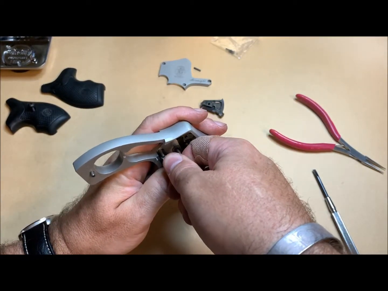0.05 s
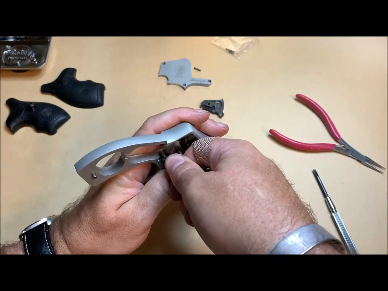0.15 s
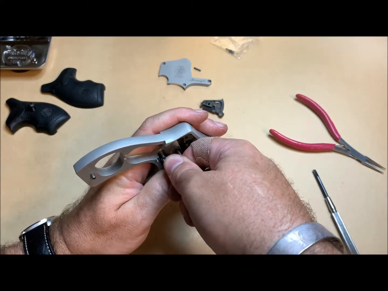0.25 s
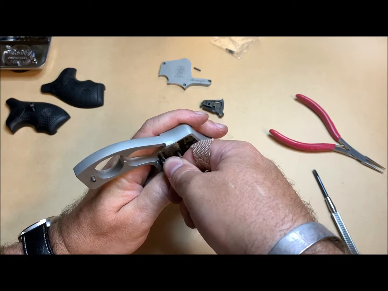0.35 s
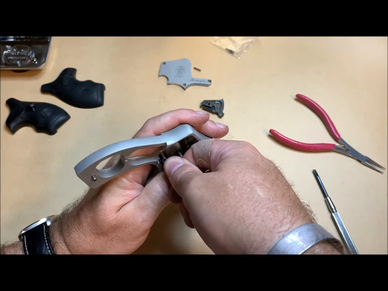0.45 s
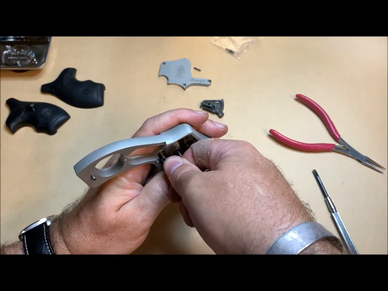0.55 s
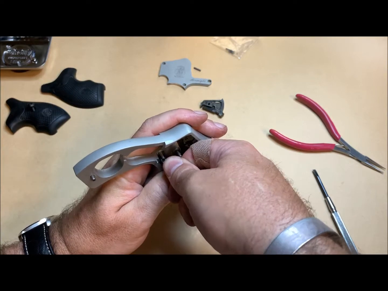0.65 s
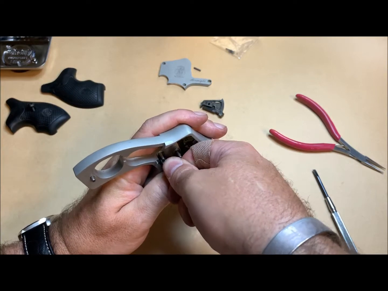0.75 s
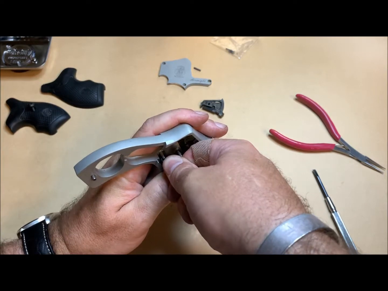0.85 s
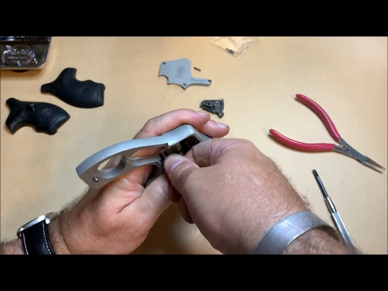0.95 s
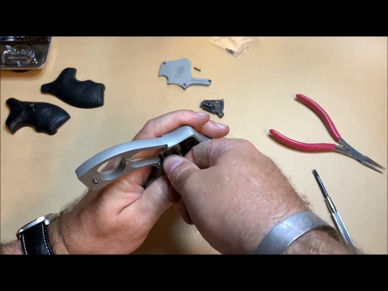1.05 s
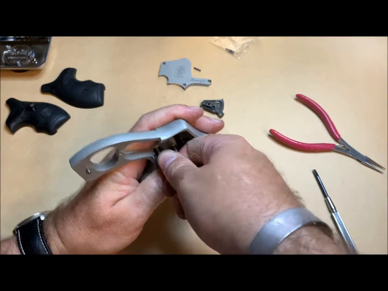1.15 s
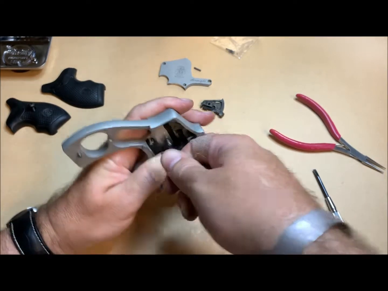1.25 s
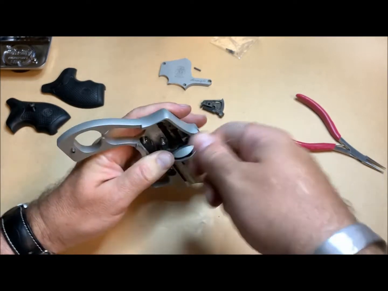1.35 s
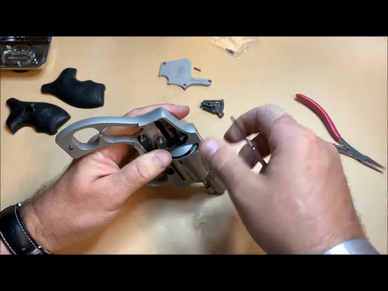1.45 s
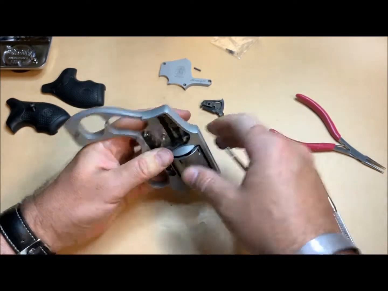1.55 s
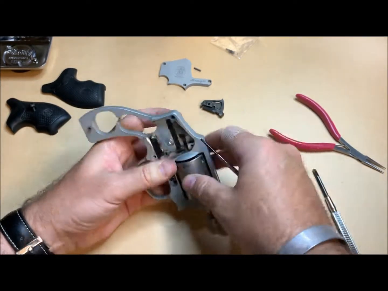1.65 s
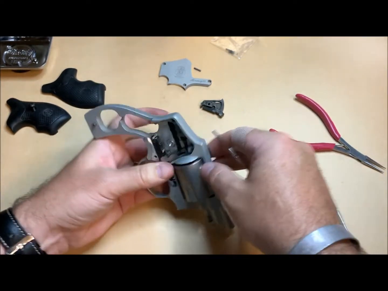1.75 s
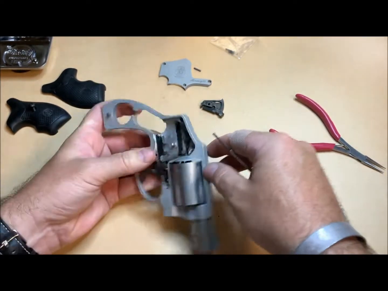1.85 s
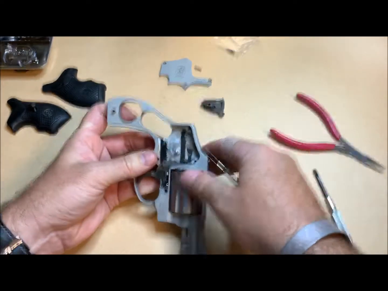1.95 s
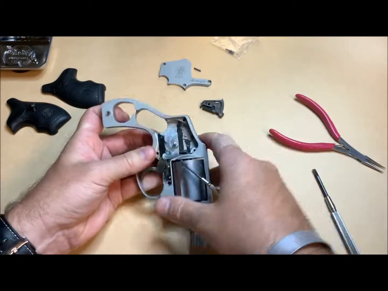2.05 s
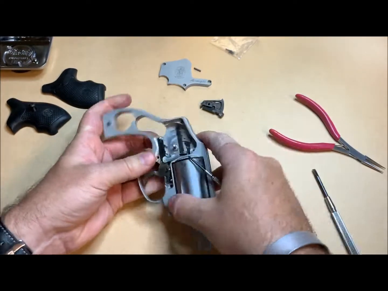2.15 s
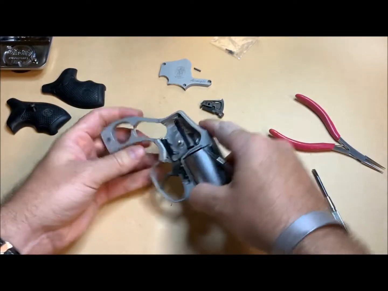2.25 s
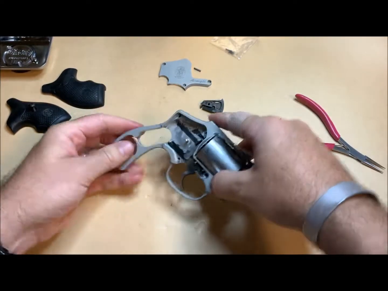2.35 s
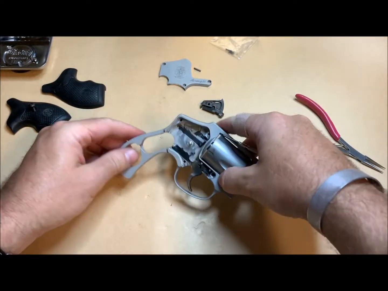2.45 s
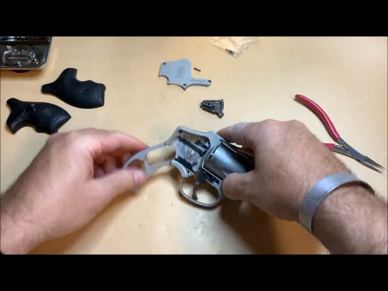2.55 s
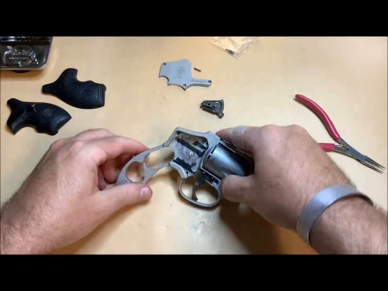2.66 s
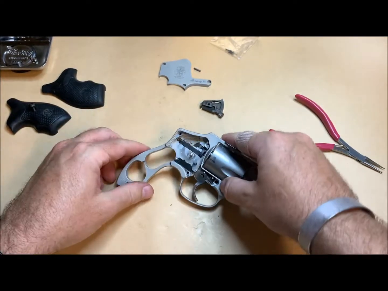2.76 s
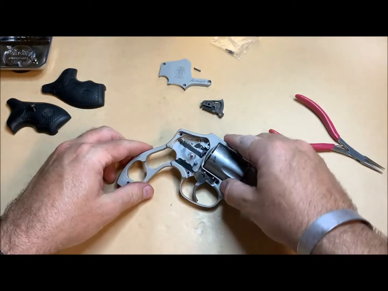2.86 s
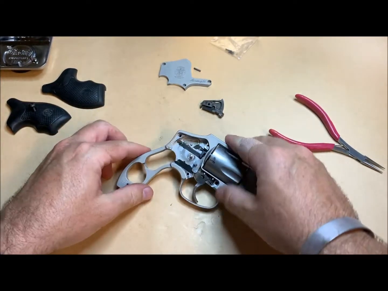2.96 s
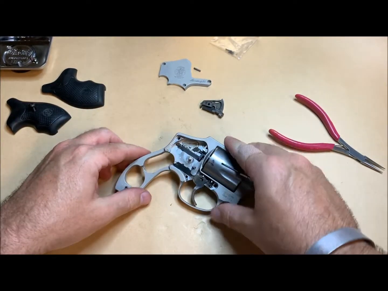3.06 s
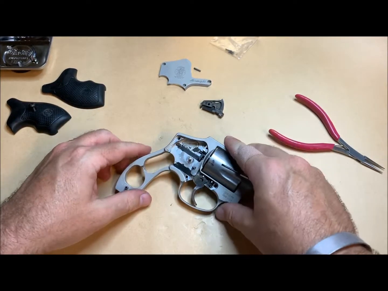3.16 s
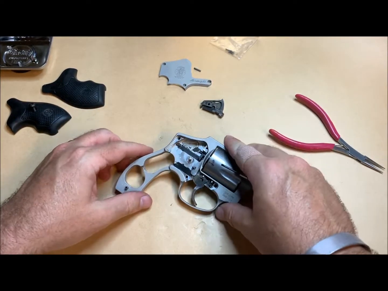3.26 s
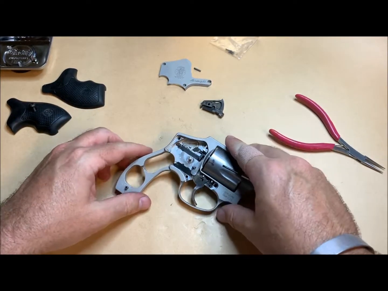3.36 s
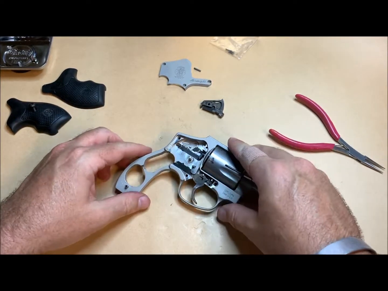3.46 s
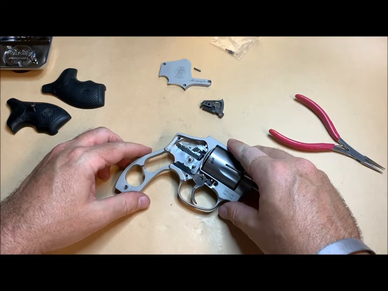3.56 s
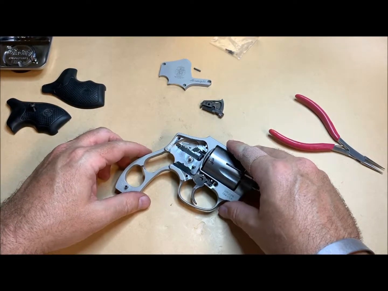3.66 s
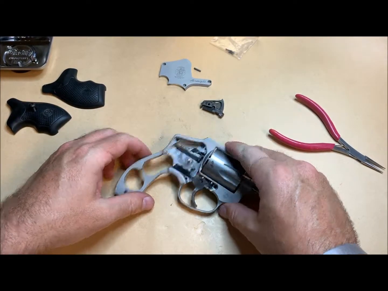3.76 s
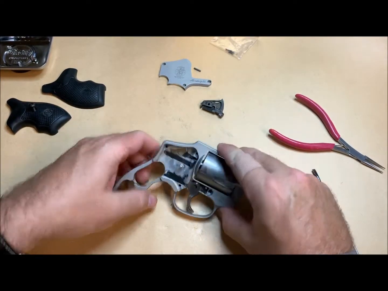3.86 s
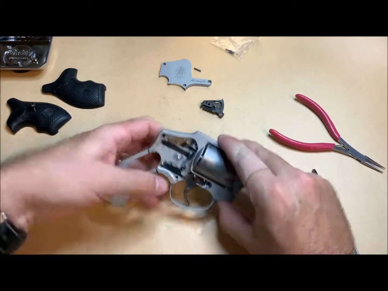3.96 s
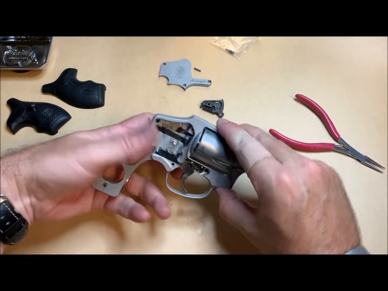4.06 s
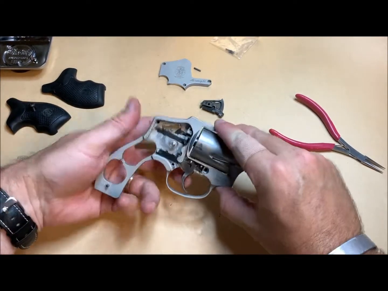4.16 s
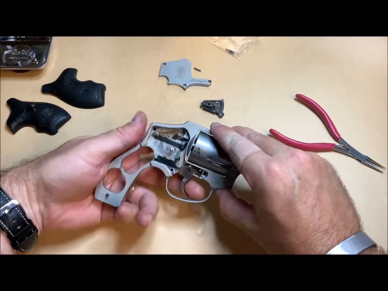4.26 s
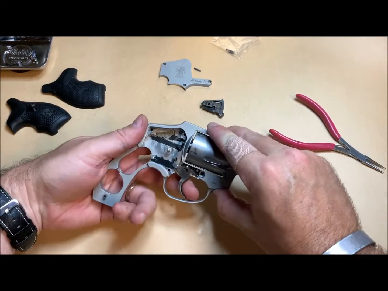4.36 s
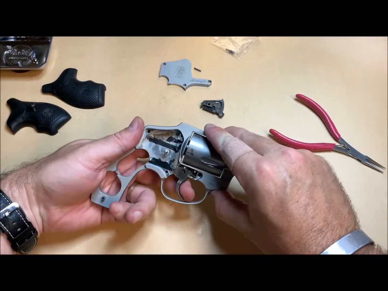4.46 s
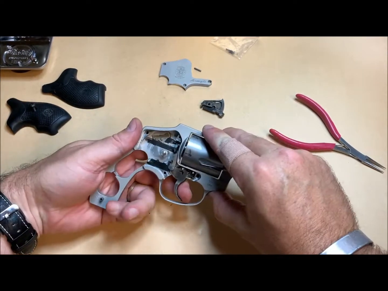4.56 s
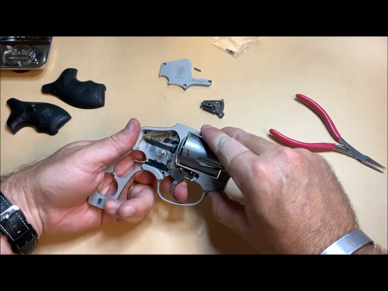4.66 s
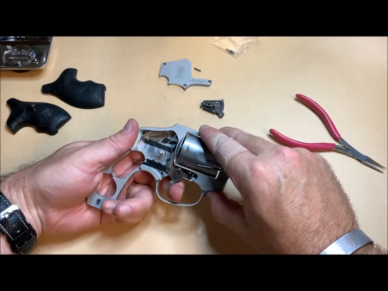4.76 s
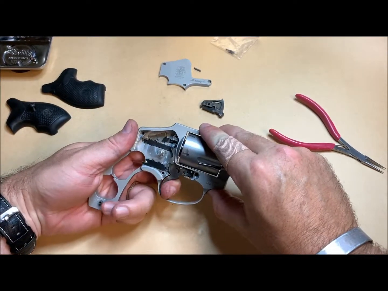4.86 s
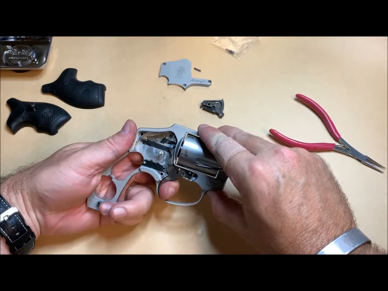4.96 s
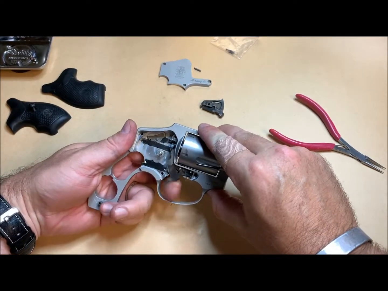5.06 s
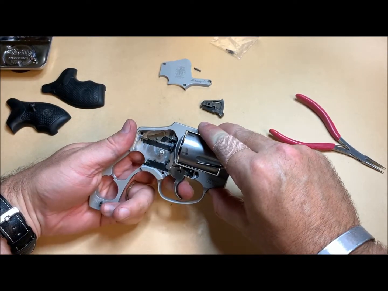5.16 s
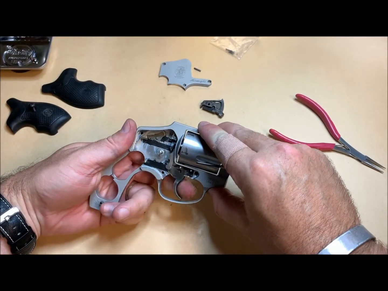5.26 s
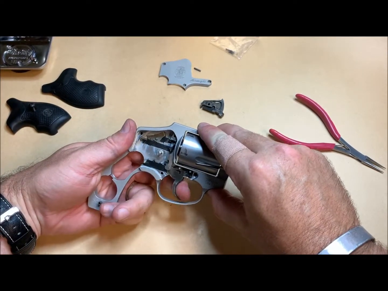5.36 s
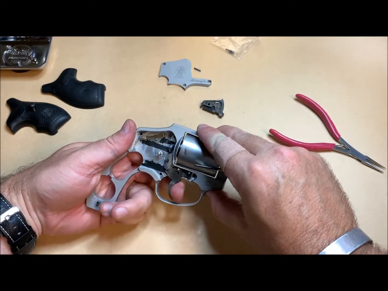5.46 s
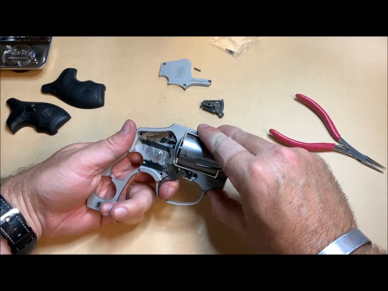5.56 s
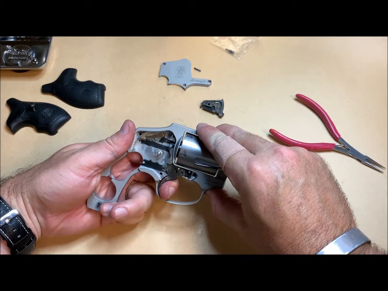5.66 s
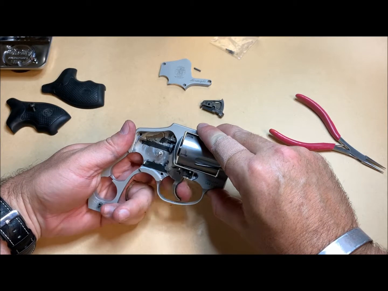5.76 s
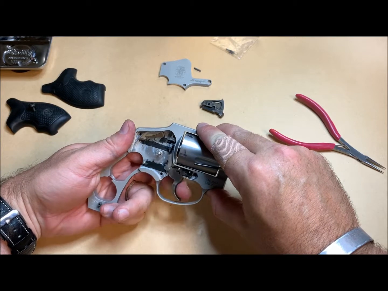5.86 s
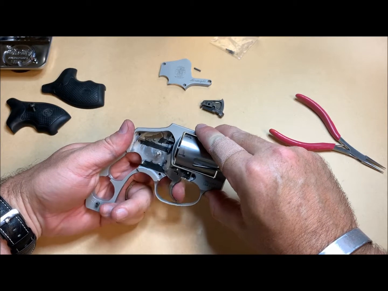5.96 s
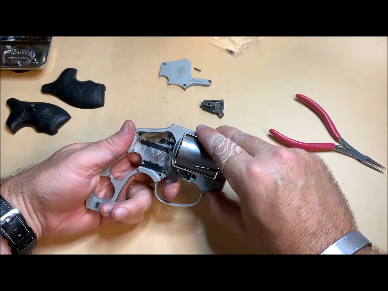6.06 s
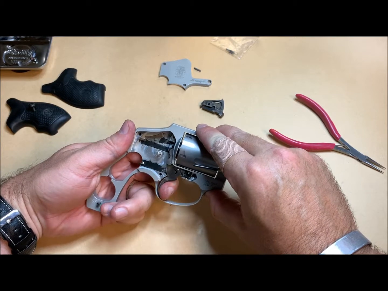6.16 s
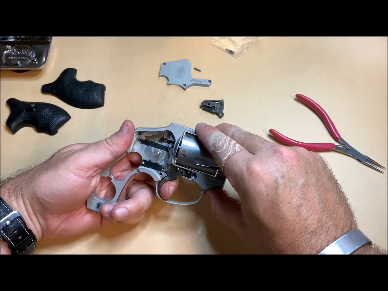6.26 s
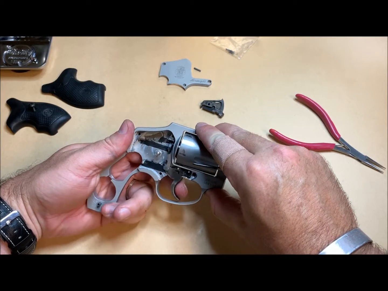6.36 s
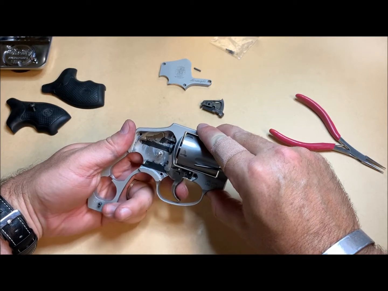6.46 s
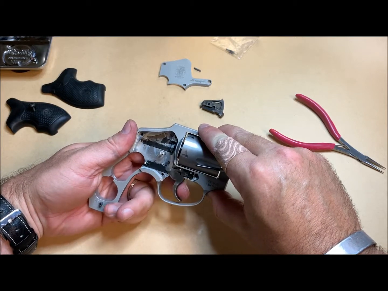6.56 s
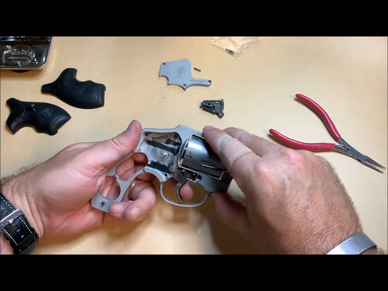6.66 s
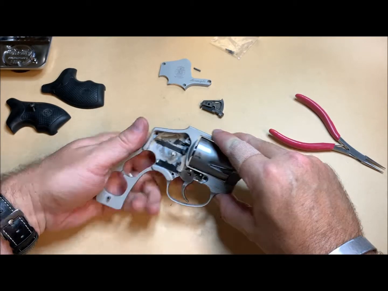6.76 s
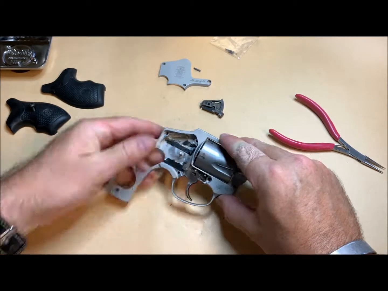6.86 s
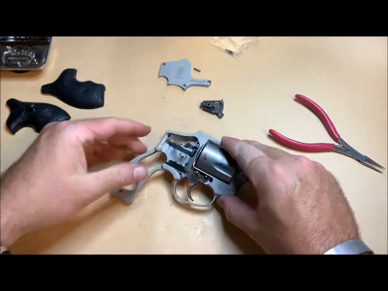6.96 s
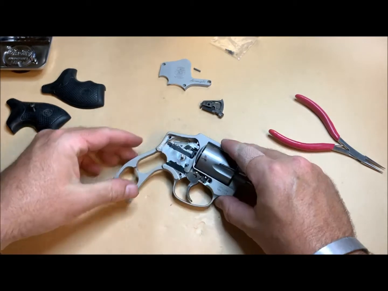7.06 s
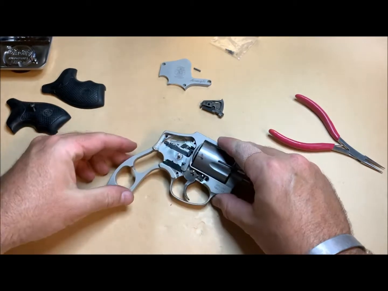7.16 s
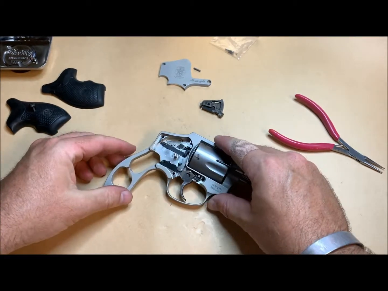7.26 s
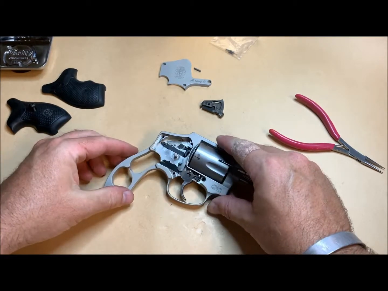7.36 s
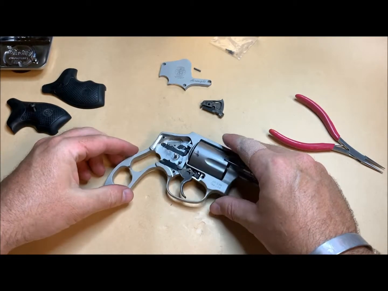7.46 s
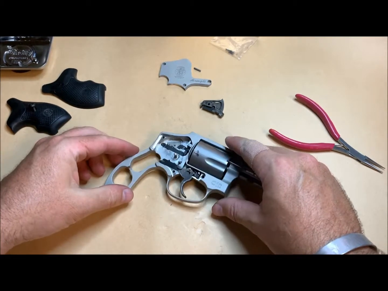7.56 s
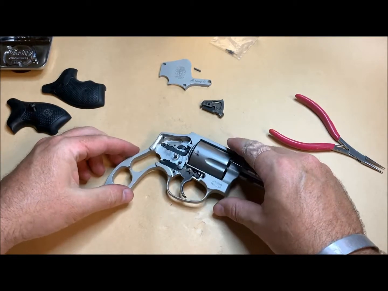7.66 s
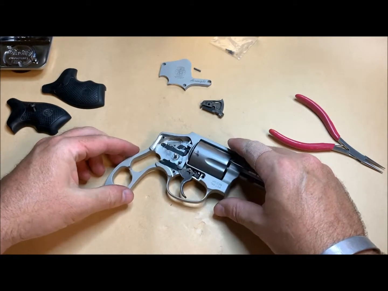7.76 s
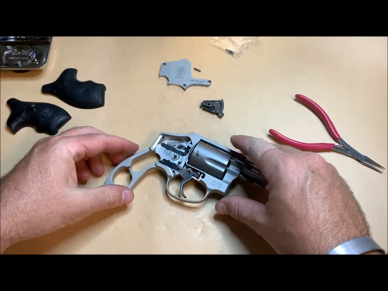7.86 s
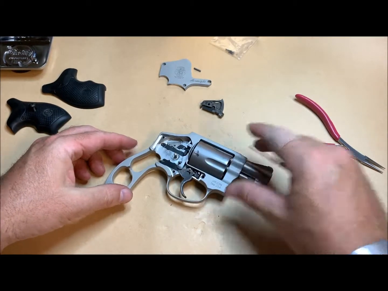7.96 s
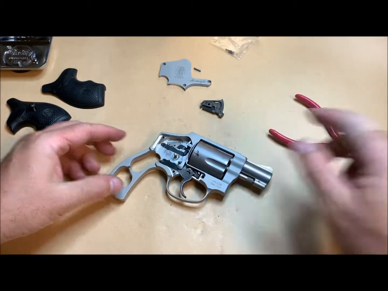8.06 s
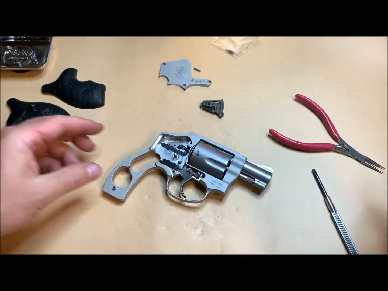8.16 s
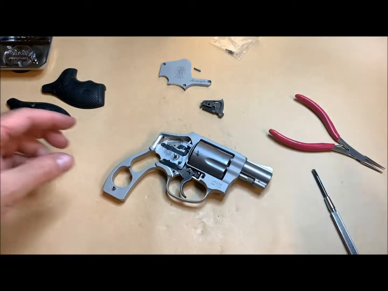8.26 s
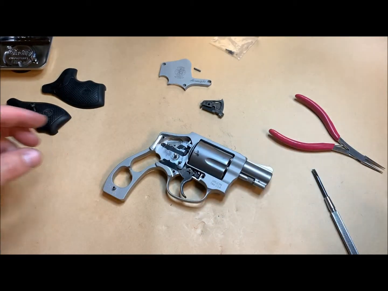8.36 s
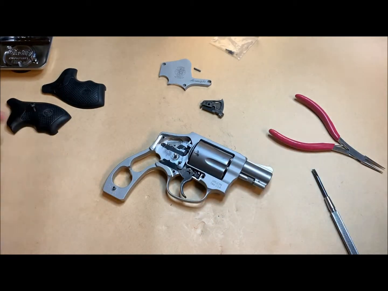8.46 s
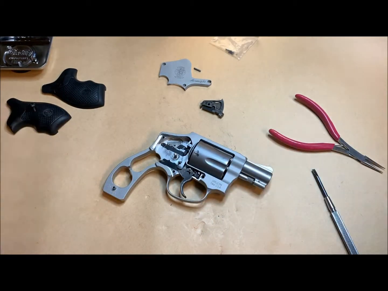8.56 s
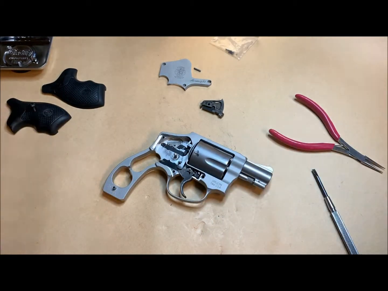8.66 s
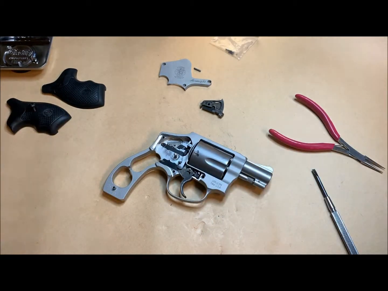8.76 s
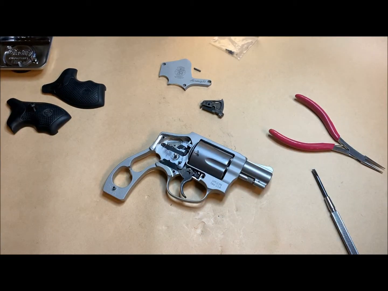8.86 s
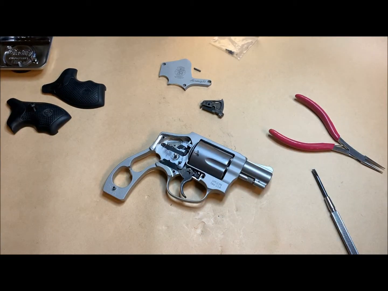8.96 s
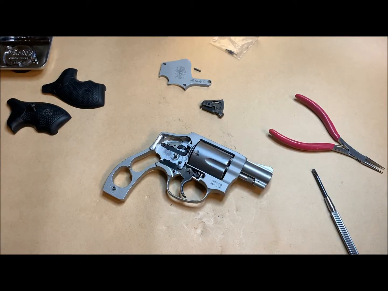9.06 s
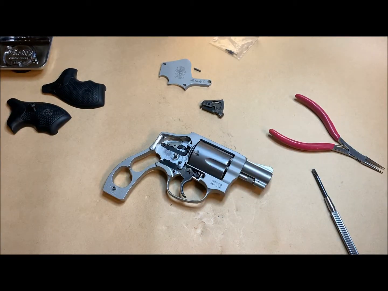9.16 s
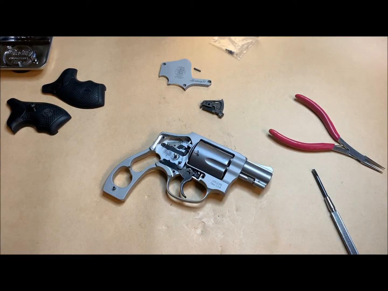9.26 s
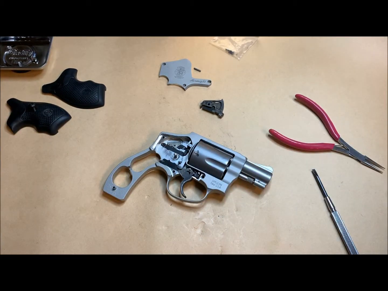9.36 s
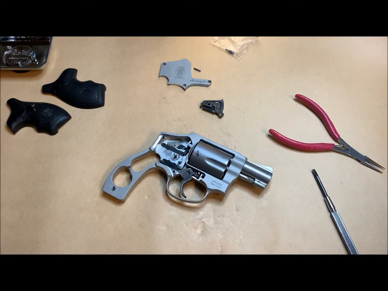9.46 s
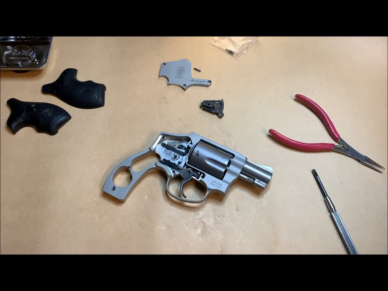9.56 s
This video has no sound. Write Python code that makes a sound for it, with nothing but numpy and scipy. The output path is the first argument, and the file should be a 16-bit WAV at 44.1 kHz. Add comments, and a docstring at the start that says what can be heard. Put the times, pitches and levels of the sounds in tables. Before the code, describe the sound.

Close, dry metallic clicks of a small revolver being fitted by hand: one loud snap, three action cycles, soft thumps, light ticks and scratches.

```python
"""Light ticks and hard steel clacks: a revolver, side plate off, is put together over a bench in a small, quiet room.
A sprung part snaps home, the frame bumps the bench, the action is worked three times, the gun is laid down;
a few light taps and scratches follow. Metal contacts are coloured noise bursts with ringing frame modes and pings.
The bench booms and thuds in low modes, skin hisses on steel, and a short diffuse tail, air and hum lie behind."""
import sys
import numpy as np
from scipy import signal
from scipy.fft import rfft, irfft
from scipy.io import wavfile
from scipy.ndimage import uniform_filter1d

SR = 44100
rng = np.random.default_rng(int(sys.argv[2]) if len(sys.argv) > 2 else 0)


def bounce(signal):
    """Save signal as a 16-bit WAV file at the path given by the first command-line argument."""
    frames = np.transpose(np.atleast_2d(signal))
    limited = np.clip(frames, -1, 1)
    pcm = np.round(limited * 32767).astype(np.int16)
    wavfile.write(sys.argv[1], SR, pcm)


N = 423360

# Events that both the steel and the bench answer: times in s, levels in dB
SNAP_S, SNAP_DB = 1.0298, -13  # the sprung part snaps home
TAP_S, TAP_DB = 8.3113, -45.5  # a light tap on the bench once the gun is put down
TOOL_S, TOOL_DB = 9.3005, -41  # a tool is knocked at the side of the bench
# the frame lands on the bench: (time [s], steel level [dB], boom peak [dB])
FRAME_LANDINGS = [(2.063, -48.5, -29.5), (2.6662, -55, -64), (2.675, -63, -42.5), (2.6899, -60.5, -39),
                  (7.053, -61, -38.5), (7.193, -52, -54)]


def gain_of(db):
    """Decibels to an amplitude factor."""
    return 10 ** (np.asarray(db) / 20)


def unit(x):
    """Scales a sound to energy 1."""
    return x / np.sqrt(np.sum(x ** 2) + 1e-20)


def read(points, hz):
    """Joins (frequency [Hz], value) points by straight lines over log frequency."""
    f, value = np.transpose(points)
    return np.interp(np.log(hz + 1), np.log(f + 1), value)


def add(mix, s, sound):
    """Lays a sound into the mix at time s, cut at the end of the mix."""
    part = mix[round(s * SR):][:len(sound)]
    part += sound[:len(part)]


def coloured(x, points, size=2048):
    """Causal minimum-phase filter through (frequency [Hz], gain [dB]): nothing sounds ahead of a blow."""
    log_gain = np.log(gain_of(read(points, abs(np.fft.fftfreq(size, 1 / SR)))))
    taps = np.fft.ifft(np.exp(np.conj(signal.hilbert(log_gain)))).real
    return signal.fftconvolve(x, taps[:size // 2])[:len(x)]


def whitened(x, smooth_hz=450):
    """Evens out the broad humps of a burst's spectrum and keeps its fine grain."""
    spectrum = rfft(x)
    width = max(3, int(smooth_hz * len(x) / SR))
    power = uniform_filter1d(abs(spectrum) ** 2, width)
    return irfft(spectrum / np.sqrt(abs(power) + 1e-9), len(x))


def ring(modes, t):
    """The dying sines of a struck object, from (frequency [Hz], level [dB], t60 [s])."""
    return sum(gain_of(db - 60 * t / t60) * np.sin(2 * np.pi * hz * t) for hz, db, t60 in modes)


def contacts():
    """Every touch of metal in the handling: (time [s], level [dB], kind, extra level of its ping [dB])."""
    # trigger pulls: (time of the lock [s], lock level [dB], tick lead [s], tick level [dB],
    # hammer lag [s], extra level of the springs' ping [dB])
    trigger_pulls = [(4.914, -33, 0.047, -53, 0.017, -15), (5.6257, -31, 0.046, -49.5, 0.021, 5),
                     (6.188, -31, .057, -69, .0241, 14)]
    # trigger releases: (time of the second tick [s], clack lag [s], extra level of the springs' ping [dB])
    trigger_releases = [(5.2097, 0.013, -10), (5.8479, 0.0093, 14.5), (6.4482, 0.017, 4)]
    # small bright clicks that ring briefly: (time [s], level [dB])
    bright_clicks = [(1.2937, -38.5), (1.8923, -48.5)]
    # the finger takes up the trigger's slack: (time [s], level [dB])
    slack_clicks = [(5.538, -64), (6.0925, -64.5)]
    # dull, faint touches of metal as things are handled: (time [s], level [dB])
    dull_touches = [(1.9648, -66), (2.232, -65.5), (2.301, -64.5), (2.403, -71), (3.8787, -64.5),
                    (8.893, -61)]
    # thin, faint scratches of handling: (time [s], level [dB])
    faint_scratches = [(1.548, -60.5), (8.3623, -61), (8.438, -62), (8.4908, -64), (8.5125, -54.5),
                       (8.537, -59.5)]
    slip_lead_s, slip_db = 0.0044, -52.5
    shudder_lag_s, shudder_db = .0033, -15.5
    hammer_db = -22  # the mainspring gives every fall the same force
    reset_gap_s, first_tick_db, second_tick_db, return_db = .006, -47.5, -41.5, -22

    # the sprung part slips just before it snaps home and shudders just after
    rows = [(SNAP_S - slip_lead_s, slip_db, "snap", 0),
            (SNAP_S, SNAP_DB, "snap", 0),
            (SNAP_S + shudder_lag_s, shudder_db, "shudder", 0),
            (TAP_S, TAP_DB, "tap", 0),
            (TOOL_S, TOOL_DB, "tool", 0)]
    # each pull: a tick, the cylinder locking, then the hammer
    for s, lock_db, lead, tick_db, lag, ping_db in trigger_pulls:
        rows += [(s - lead, tick_db, "tick", ping_db),
                 (s, lock_db, "lock", ping_db),
                 (s + lag, hammer_db, "hammer", ping_db)]
    # each release: two ticks as the parts reset, then the clack of the return
    for s, lag, ping_db in trigger_releases:
        rows += [(s - reset_gap_s, first_tick_db, "tick", ping_db),
                 (s, second_tick_db, "tick", ping_db),
                 (s + lag, return_db, "return", ping_db)]
    # "settle" and "rattle" are mere labels of a tone colour: small and bright, dull and faint
    for kind, table in [("settle", bright_clicks), ("take-up", slack_clicks), ("rattle", dull_touches),
                        ("landing", FRAME_LANDINGS), ("scratch", faint_scratches)]:
        rows += [(s, db, kind, 0) for s, db, *_ in table]
    return rows


def chatter(t, contact, rise=.00018, t60=.033, drop_db=-7.0, uneven_db=0.5, uneven_hz=2500):
    """Steel faces chatter in a dense, uneven burst; the gripping hand soon damps what is left."""
    after = np.maximum(t - contact, 0)
    fall_db = drop_db * np.minimum(after / contact, 1) - 60 * after / t60
    grain, force = rng.standard_normal((2, len(t)))
    force_db = uneven_db * np.interp(t * uneven_hz, np.arange(len(t)), force)
    return grain * (1 - np.exp(-t / rise)) * gain_of(fall_db + force_db)


def lockwork(bass_db=-20, level_db=0, damping=.6, typical_contact=0.0014, hold_t60=0.037, spot_db=3):
    """Each contact is a burst in its own colour that passes the steel frame and sets it ringing."""
    # contact by kind: (chatter time [s], frame ring against the burst [dB], then colour against 9.5 kHz:
    # knock at 800 Hz [dB], clack at 2.2 kHz [dB], clink at 5 kHz [dB], edge at 14 kHz [dB])
    touch_by_kind = {"snap": (.002, -26, -9.5, -4.5, 7, 11), "shudder": (.004, -25, -27.5, -14.5, -6.5, 4),
                     "settle": (.0021, -24, -9, -1, 10.5, 14), "take-up": (.0018, -23, -11, -12, 4, -2),
                     "tick": (.002, -23, -21, -26, -13, -2), "lock": (.0026, -23, -24, -23, -9.5, 2.5),
                     "hammer": (.0022, -23.5, -2.3, -14, -1.3, 4.6),
                     "return": (.0028, -22, -22.5, -20, -6.5, -.5), "rattle": (.0035, -25, 12, 15, 5, 2),
                     "landing": (.004, -25, 13, 10, -3, 1.5), "tap": (.0005, -38, 11, 17.5, -1, 5.5),
                     "tool": (.0023, -24, -5, 14.5, 2.5, 13), "scratch": (.0034, -23, -10, -18, -16, 6)}
    # where knock, clack, clink, reference and edge lie: (frequency [Hz])
    colour_hz = [800, 2200, 5000, 9500, 14000]
    # modes of the frame, ahead of colour and spot: (frequency [Hz], level [dB], t60 [s])
    frame_modes = [(2600, -7, .2), (3575, -4, .25), (4210, -4, .25), (4580, -3, .3), (5450, -4, .3),
                   (5740, -7, .3), (6930, -6, .22), (7980, -2, .32), (8480, -3, .24), (9500, -6, .25),
                   (10350, -4, .28), (10920, -5, .26), (12400, -5, .24), (13130, -5, .25), (14220, -3, .21),
                   (14660, -3, .21)]
    # bands the hand-damped frame favours or swallows: (centre [Hz], width [Hz], gain [dB])
    body_bands = [(670, 90, 3), (980, 82, 4), (1390, 170, -3), (2750, 480, -2), (3530, 170, 1.5),
                  (4420, 150, 2.5), (6581, 350, -4), (8000, 120, 1), (8950, 210, -0.5), (10800, 298.5, 2.5)]
    t, out = np.arange(SR // 3) / SR, np.zeros(N)
    hz = np.arange(0, SR // 2, 20)
    body_db = sum(db * np.exp(-.5 * ((hz - f) / width) ** 2) for f, width, db in body_bands)
    span = np.sqrt(SR / 100)  # a burst's energy is its level held for a hundredth of a second

    for s, db, kind, _ in contacts():
        contact, ring_db, knock, clack, clink, edge = touch_by_kind[kind]
        contact = np.clip(contact, .0003, .0045)
        # parts this small hardly radiate below the knock
        colour = [(290, knock + bass_db), (620, knock)]
        colour += list(zip(colour_hz, [knock, clack, clink, 0, edge]))

        # a brief touch also dies sooner
        burst_t60 = hold_t60 * (contact / typical_contact) ** damping
        burst = chatter(t, contact, t60=burst_t60)
        burst = whitened(burst) * (t < t[-1] / 2)
        burst = unit(coloured(burst, np.transpose([hz, read(colour, hz) + body_db])))

        # the spot that is struck decides which modes speak most
        struck_modes = [(f, mode_db + read(colour, f) + spot_db * rng.uniform(-1, 1), t60)
                        for f, mode_db, t60 in frame_modes]
        steel = unit(ring(struck_modes, t))
        add(out, s, gain_of(db + level_db) * span * (burst + gain_of(ring_db) * steel))
    return out


def springs(rise=0.0004):
    """Springs, pins and other parts sing in short pings at certain kinds of contact."""
    # pings by kind, ahead of the contact's extra: (frequency [Hz], level against the contact [dB], t60 [s])
    pings_by_kind = {"snap": [(12260, -9, .046), (5880, -4.5, 0.043), (5740, -36.5, 0.22),
                     (12500, -31, .3)], "settle": [(9000, -22, 0.34), (5860, -1.5, 0.031),
                     (14200, 8, .012)], "lock": [(13300, -5, .015), (14500, 2, .008), (15200, 5, 0.0087)],
                     "hammer": [(12840, -1, .009), (15000, 0, 0.012)], "return": [(5630, -9, 0.0095),
                     (4490, -39.5, 0.25)], "tap": [(1395, 17, 0.0063), (2950, 15, 0.0064)],
                     "tool": [(277, -8, .08), (3270, 7, 0.014), (2790, -1.5, 0.03), (4850, -3, 0.024),
                     (13250, 1, .02)]}
    t, out = np.arange(SR // 3) / SR, np.zeros(N)
    for s, db, kind, ping_db in contacts():
        if kind in pings_by_kind:
            ping = ring(pings_by_kind[kind], t) * (1 - np.exp(-t / rise))
            add(out, s, gain_of(db + ping_db) * ping)
    return out


def blows():
    """What reaches the bench: (time [s], boom peak [dB], thud against the boom [dB])."""
    # a hand bumps the bench: (time [s], boom peak [dB])
    hand_bumps = [(4.288, -50), (7.604, -49)]
    # the harder the striker, the more thud
    snap_boom_db, snap_thud_db = -43.5, 0
    tap_boom_db, tap_thud_db = -65, 7.5
    tool_boom_db, tool_thud_db = -55.5, 3.5
    landing_thud_db, hand_thud_db = -15, -19
    action_boom_db, action_thud_db = -59, -10  # hammer and return come through the resting hands

    rows = [(SNAP_S, snap_boom_db, snap_thud_db),
            (TAP_S, tap_boom_db, tap_thud_db),
            (TOOL_S, tool_boom_db, tool_thud_db)]
    rows += [(s, boom_db, landing_thud_db) for s, _, boom_db in FRAME_LANDINGS]
    rows += [(s, boom_db, hand_thud_db) for s, boom_db in hand_bumps]
    rows += [(s, action_boom_db, action_thud_db)
             for s, _, kind, _ in contacts() if kind in ("hammer", "return")]
    return rows


def bench(thud_t60=.09, slap_db=-9, slap_t60=.012, swing_s=.009):
    """The top booms in its low modes, with a dull thud of crowded higher ones and a short slap at the touch."""
    # modes of the bench top, relative levels: (frequency [Hz], level [dB], t60 [s])
    bench_modes = [(76.4, -4.5, 0.17), (105.4, -4, 0.17), (117, -1, 0.082), (178.9, -19.5, 0.097),
                   (264, -15.5, 0.057)]
    thud_colour = [(40, -13.5), (150, -1.5), (280, -2), (550, -6.0),
                   (1000, -17.0), (2000, -27), (6000, -46.0)]  # (frequency [Hz], gain [dB])
    slap_colour = [(200, 0.5), (700, 1), (1500, -6.5), (5000, -29.5)]
    t, out = np.arange(SR // 2) / SR, np.zeros(N)
    boom = ring(bench_modes, t) * (1 - np.exp(-t / swing_s))  # the heavy top takes a moment to swing
    boom = boom / abs(boom).max()
    for s, db, thud_db in blows():
        slow, quick = rng.standard_normal((2, len(t)))
        thud = coloured(slow * gain_of(-60 * t / thud_t60), thud_colour)
        slap = coloured(quick * gain_of(-60 * t / slap_t60), slap_colour)
        knock = np.linalg.norm(boom) * (unit(thud) + gain_of(slap_db) * unit(slap))
        add(out, s, gain_of(db) * (boom + gain_of(thud_db) * knock))
    return out


def rubbing(grain_db=1.0, grain_hz=90):
    """Soft hiss of skin on steel and bench that catches and slips as the grip changes."""
    # rubs: (start [s], end [s], rms level ahead of the fades [dB], share of time spent fading [0-1],
    # gain at 1.2 kHz [dB])
    skin_rubs = [(1.395, 2.63, -66.5, 0.66, 2), (3.857, 4.068, -67.5, 0.1, 5),
                 (6.827, 7.086, -63, 0.83, -3), (7.1, 8.099, -72.5, 0.57, 3.5)]
    # colour of the hiss above that: (frequency [Hz], gain [dB])
    skin_colour = [(2000, -5), (3600, -3), (5000, 2.5), (6500, -6), (10000, 3), (14000, 2.5), (16000, 5)]
    out = np.zeros(N)
    for start, end, db, fade, low_db in skin_rubs:
        hiss, catch = rng.standard_normal((2, 2 * SR))
        t = np.arange(int((end - start) * SR)) / SR
        slips = gain_of(grain_db * np.interp(t * grain_hz, np.arange(len(catch)), catch))
        colour = [(300, low_db - 7.0), (1200, low_db)] + list(skin_colour)
        rub = unit(coloured(hiss[:len(t)] * slips, colour))
        add(out, start, gain_of(db) * np.sqrt(len(t)) * rub * signal.windows.tukey(len(t), fade))
    return out


def jolt(s=1.0315, peak_db=-30, rise=.003):
    """The hard snap jolts the hands and shoves air at the microphone in one soft, deep push."""
    u, out = np.arange(SR // 5) / SR / rise, np.zeros(N)
    add(out, s, gain_of(peak_db) * u * np.exp(1 - u))
    return out


def room(x, delay=.005, build=0.003):
    """The walls answer with a short diffuse tail, each band dying at its own speed."""
    # decay of the tail: (frequency [Hz], t60 [s])
    tail_t60 = [(200, 0.54), (1000, 0.29), (4000, 0.4438), (8000, 0.3947), (15000, 0.26)]
    # colour of the tail, relative: (frequency [Hz], level [dB])
    tail_colour = [(200, -7), (600, -10), (1100, -2.5), (2200, -3), (4500, -4.5), (9000, -4.5), (15000, -1)]
    hz, t, bands = signal.stft(rng.standard_normal(2 * SR // 3), SR, nperseg=256)
    decay_db = 60 * t / read(tail_t60, hz)[:, None]
    bands = bands * gain_of(read(tail_colour, hz)[:, None] - decay_db)
    tail = signal.istft(bands, SR)[1]
    tail = tail * np.clip((np.arange(len(tail)) / SR - delay) / build, 0, 1)
    return signal.fftconvolve(x, unit(tail))[:N]


def room_tone(waver=0.26, air_db=-66, hum_hz=117.4, hum_db=-76.5):
    """Steady low rush of air, shaped from noise, with a faint electric hum wavering in level and phase."""
    # colour of the air, relative: (frequency [Hz], level per Hz [dB])
    air_colour = [(15, -43.5), (25, -14.5), (55, -5), (82, -8.5), (113, -2), (169, -13), (274, -10.5),
                  (349, -14.5), (378, -10.5), (410, -12), (598, -17.5), (666, -20), (741, -20), (1950, -32),
                  (15500, -36)]
    hz = np.fft.rfftfreq(N, 1 / SR)
    air = unit(irfft(rfft(rng.standard_normal(N)) * gain_of(read(air_colour, hz)), N))
    slow = unit(irfft(rfft(rng.standard_normal(N)) * np.exp(-hz / 5), N)) * np.sqrt(N)
    phase = 2 * np.pi * hum_hz * np.arange(N) / SR + slow[::-1]
    hum = unit((1 + waver * slow) * np.sin(phase))
    return np.sqrt(N) * (gain_of(air_db) * air + gain_of(hum_db) * hum)


def scene(room_db=-14.5):
    """Gun, hands and bench close to the microphone, the room behind them."""
    near = lockwork() + springs() + bench() + rubbing()
    return (near + gain_of(room_db) * room(near) + jolt() + room_tone())[None]


def record(dry, edge_hz=16000):
    """The recorder's band limit: a linear-phase low-pass."""
    low_pass = signal.firwin(201, edge_hz, window=("kaiser", 8), fs=SR)
    return signal.oaconvolve(dry, low_pass[None], "same")


dry = scene()
out = record(dry)
bounce(out)
```